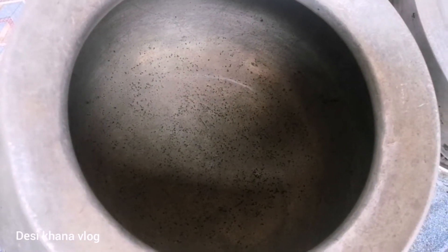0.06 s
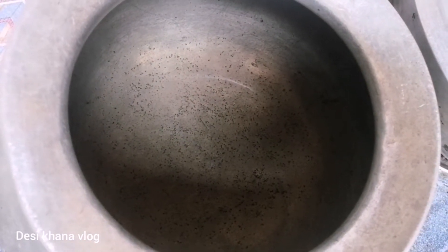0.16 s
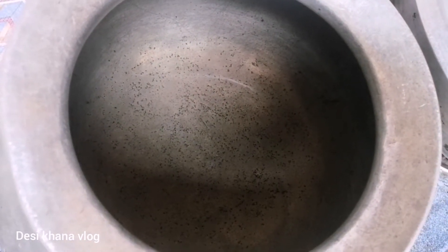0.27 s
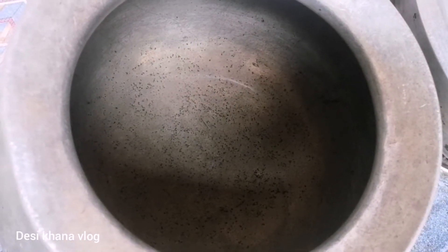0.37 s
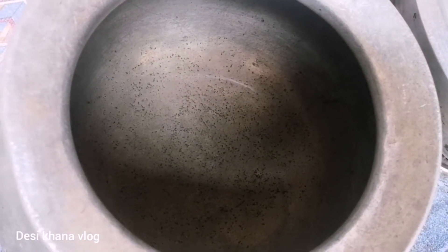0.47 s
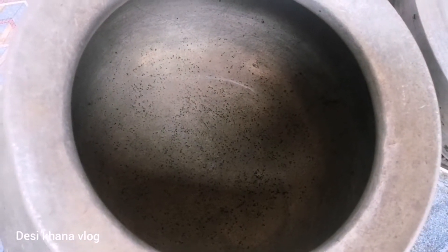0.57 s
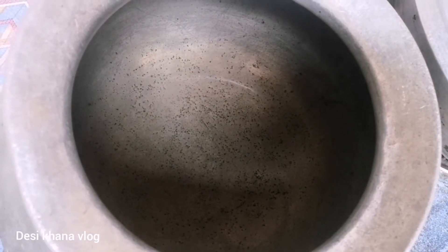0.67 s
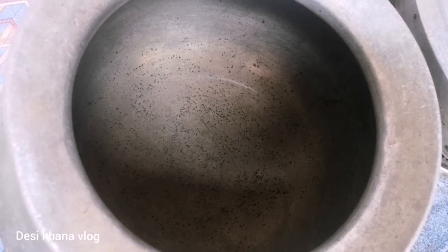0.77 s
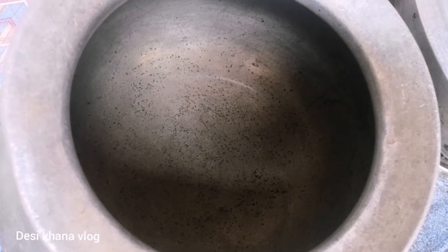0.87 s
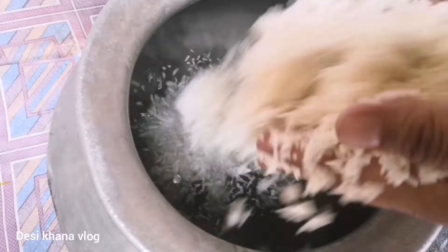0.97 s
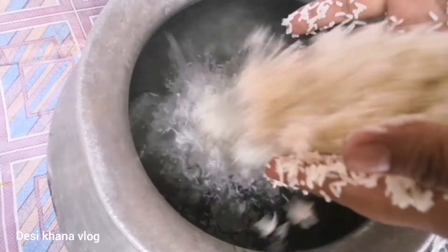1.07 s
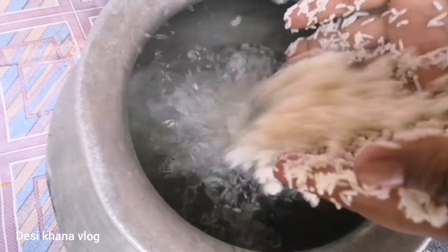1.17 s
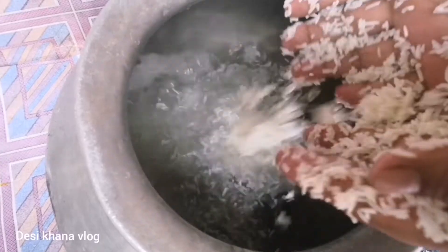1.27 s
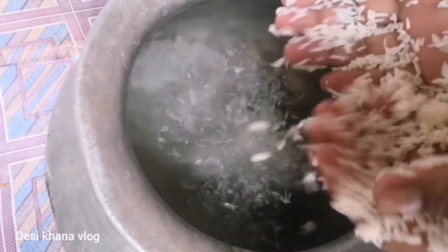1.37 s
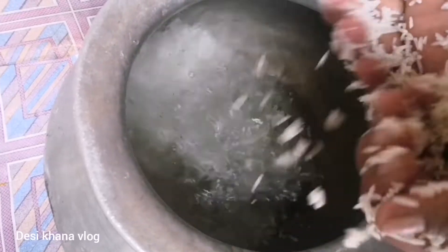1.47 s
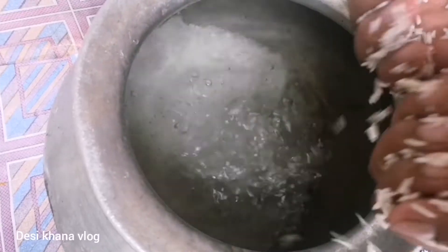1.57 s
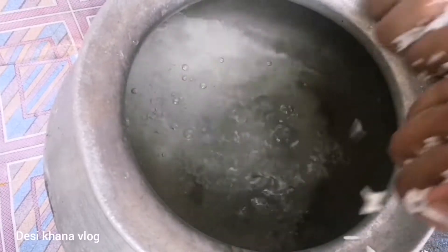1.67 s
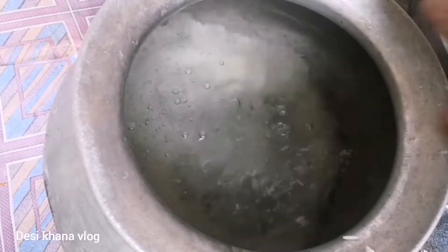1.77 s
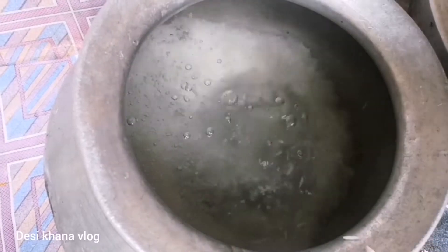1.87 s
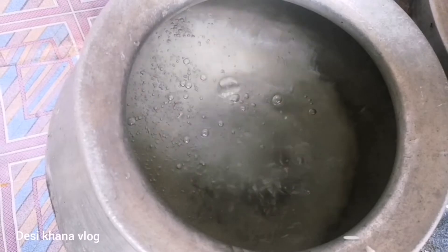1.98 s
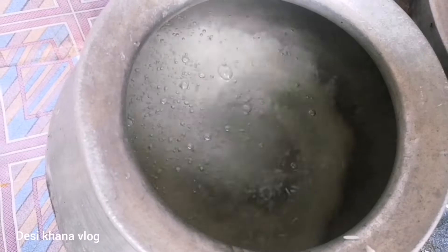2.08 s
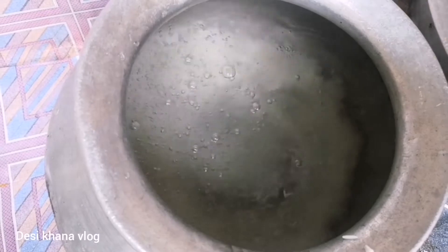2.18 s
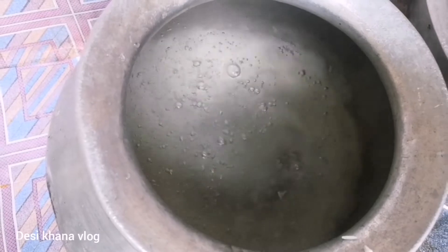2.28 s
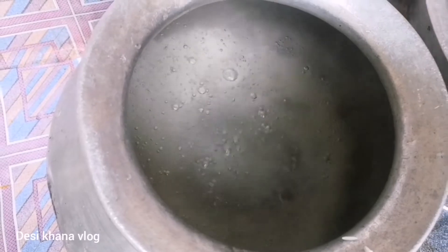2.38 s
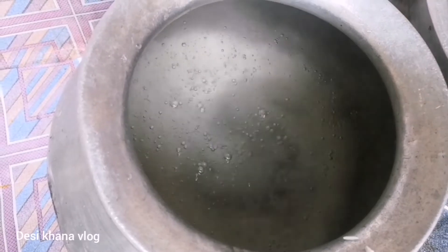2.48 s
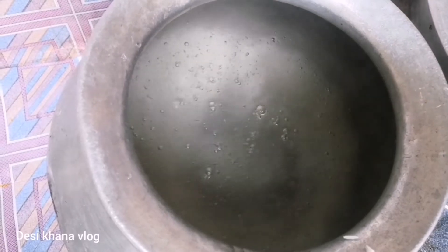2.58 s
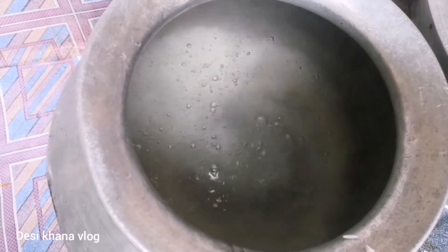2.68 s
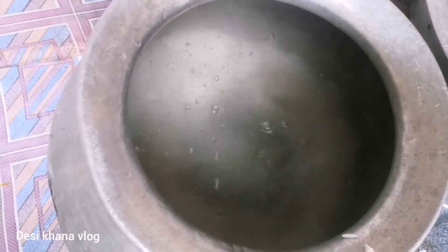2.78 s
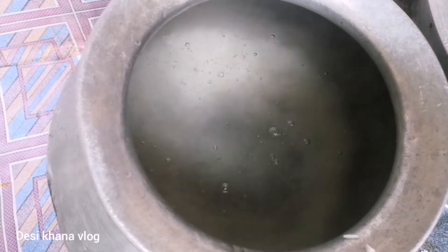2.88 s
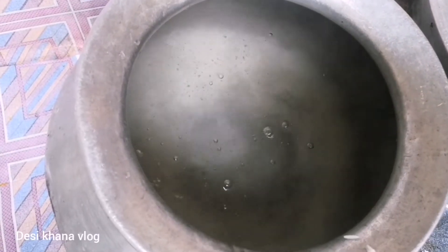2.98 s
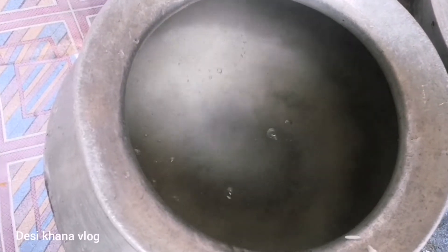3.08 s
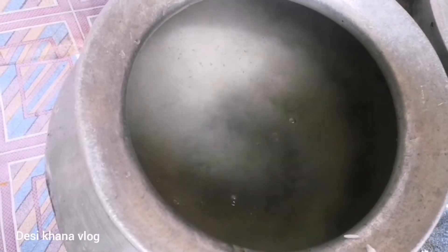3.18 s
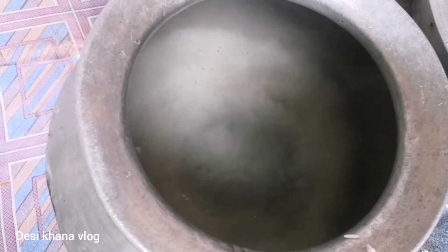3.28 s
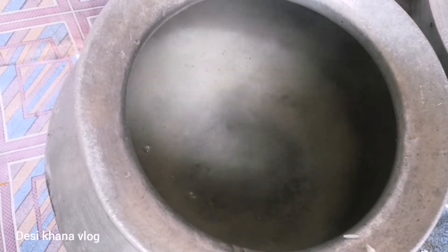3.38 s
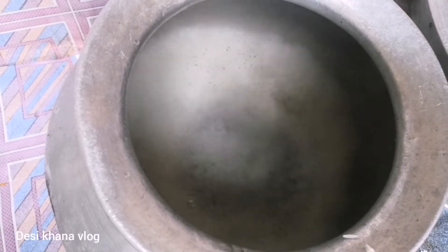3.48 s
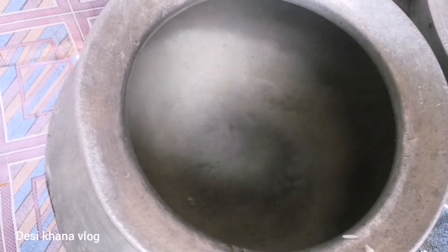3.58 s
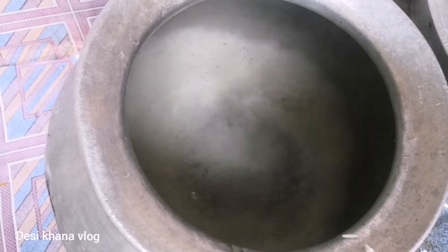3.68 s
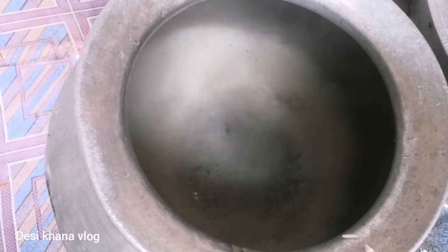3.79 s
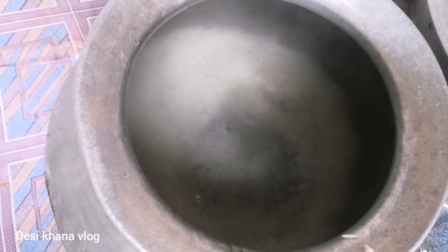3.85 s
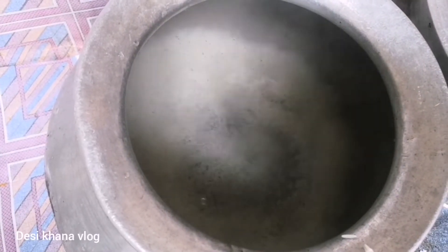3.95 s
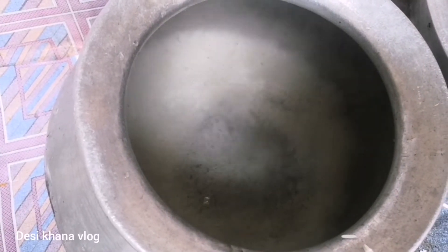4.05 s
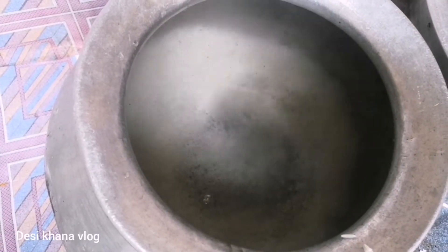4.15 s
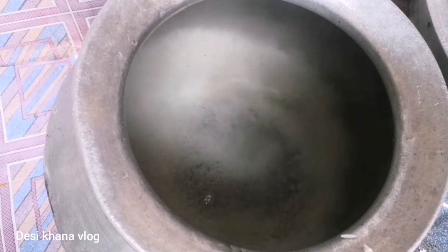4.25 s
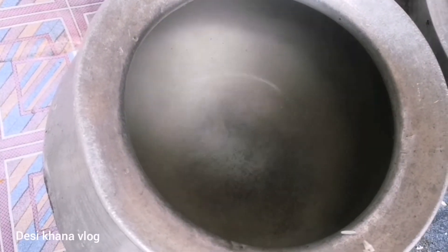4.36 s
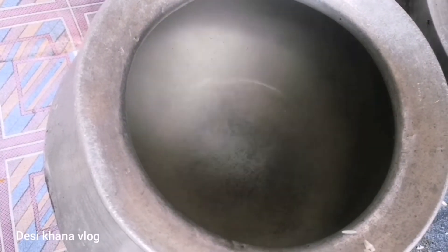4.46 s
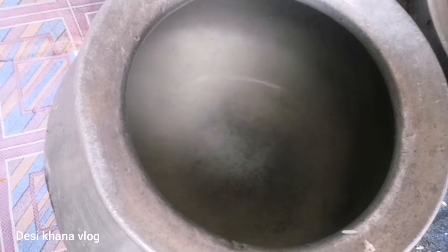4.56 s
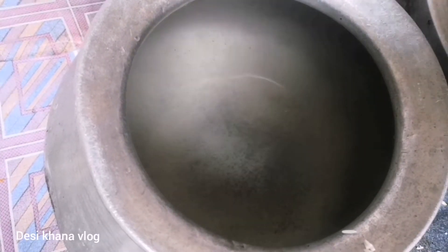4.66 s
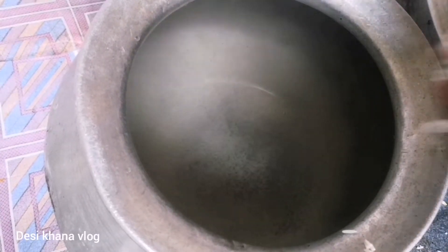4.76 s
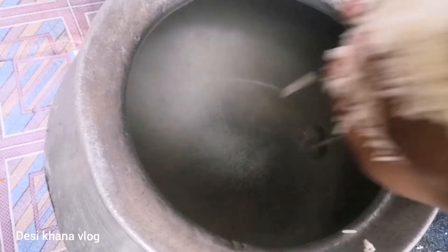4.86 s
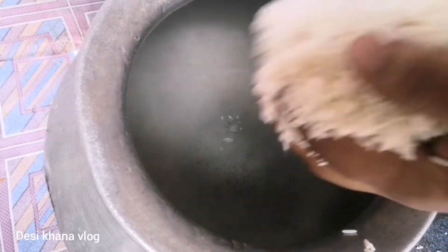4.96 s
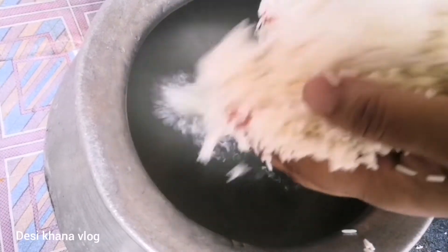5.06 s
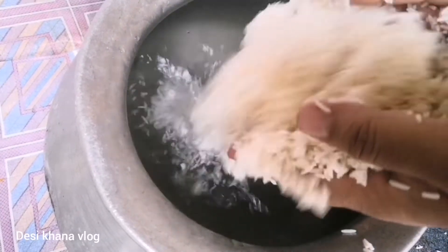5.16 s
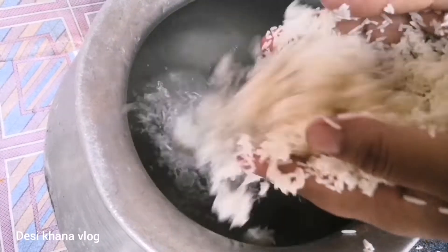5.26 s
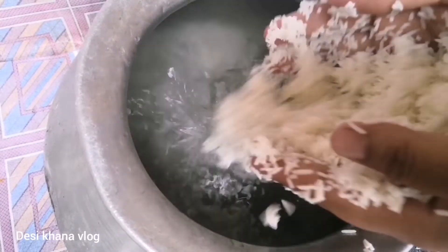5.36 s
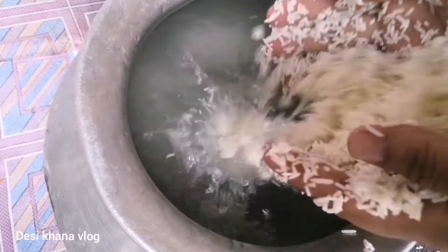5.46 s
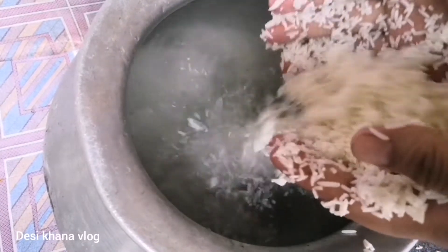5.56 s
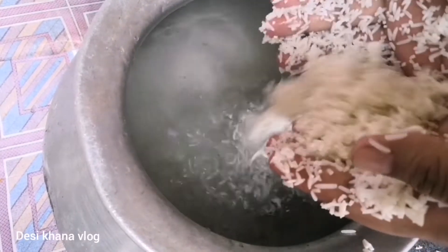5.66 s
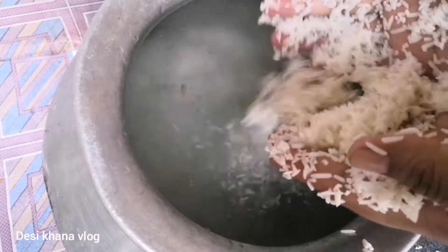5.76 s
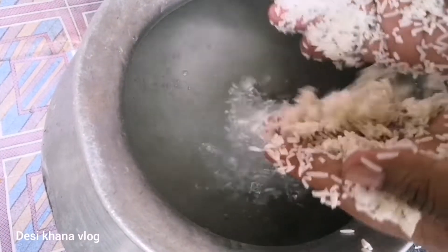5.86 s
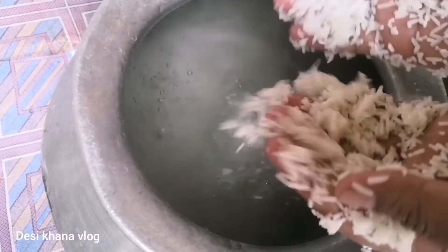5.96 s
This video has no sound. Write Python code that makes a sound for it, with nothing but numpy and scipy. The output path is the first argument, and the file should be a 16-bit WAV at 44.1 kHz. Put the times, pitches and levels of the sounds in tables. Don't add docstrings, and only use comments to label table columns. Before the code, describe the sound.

A quiet kitchen, heard close by a phone: low hum, faint hiss and the soft bright rustle of rice in hands from about 0.1 s. At 0.77 s the sound drops to silence until 0.9 s. The first handful then lands, loudest from 0.98 to 1.45 s, clumps punching into pot water with ringing bubbles, crisp spray, dense patter and low plops. A few stray grains trickle, and at 1.95-2.15 s grains flicked off fingers make a sharp cluster of plips. A lone drop falls at 2.4 s. Rustling at 2.7 s, a tiny metallic rim tick at 3.05 s, a dull bowl knock around 3.3-3.7 s, a dry palm brush at 4.2 s and a single plop at 4.5 s follow. From 5.05 s the second handful splashes in uneven, fizzing spurts with fine high pings, continuing to the end at about 6 s. Short, slight room echo.

```python
import sys
import numpy as np
from scipy import signal
from scipy.fft import rfft, irfft, next_fast_len
from scipy.io import wavfile
from scipy.ndimage import uniform_filter1d, map_coordinates

SR = 44100
rng = np.random.default_rng(int(sys.argv[2]) if len(sys.argv) > 2 else 0)


def amplitude_ratio(level_db):
    exponent = np.asarray(level_db, float) / 20
    return 10 ** exponent


def store_wav(level_fs):
    pcm = np.round(np.clip(np.atleast_2d(level_fs), -1, 1) * 32767)
    wavfile.write(sys.argv[1], SR, pcm.T.astype(np.int16))


N = 265923

# f/Hz, level/dB per Hz
SURFACE_HISS = [(250, -54), (500, 12), (1300, -5), (3000, 3.5), (8000, 0.5), (12000, -6), (15500, -9.5)]


def falling_grains():
    unevenness = amplitude_ratio(0.8 * wobble(30) + 3.2 * wobble(150))
    spurts, fizzing, plopping, finest = flow() * unevenness
    mids = patter(count=7000, hz=2600, spread=0.32, cycles=3.5, spiky_db=1.8, size=260)
    fizz = patter(count=11000, hz=5600, spread=0.27, cycles=6, spiky_db=2.8, size=180)
    plop = patter(count=2500, hz=750, spread=0.42, cycles=1.6, spiky_db=0.9, size=500)
    fine = patter(count=3000, hz=7500, spread=0.03, cycles=12, spiky_db=2, size=220)
    hiss = patchy(rush(SURFACE_HISS), depth_db=2.0)
    bright = amplitude_ratio(-5.0) * fizz + amplitude_ratio(1.02) * hiss
    return amplitude_ratio(-5.0) * spurts * mids + fizzing * bright + plopping * plop + amplitude_ratio(-17.0) * finest * fine


# start t/s, hold t/s, patter level/dB, fizz level/dB re patter
FIRST_POUR = [
    (0.936, 0.048, -36, -2),
    (0.981, 0.021, -25, -5),
    (1.041, 0.045, -32, -3),
    (1.141, 0.04, -27, -7.5),
    (1.201, 0.065, -29.5, -6.5),
    (1.292, 0.069, -33.5, -7),
    (1.417, 0.034, -39.5, -10),
]
STRAY_RICE = [
    (1.5, 0.11, -59, -7),
    (1.597, 0.017, -48.5, -6.5),
    (1.719, 0.082, -51.5, -1.5),
    (1.839, 0.052, -50, -5.5),
    (2.375, 0.0041, -43, -8),
    (2.5, 0.12, -64.5, -1),
    (3.049, 0.037, -46, -5),
    (3.2, 0.082, -67, 4.5),
    (4.482, 0.014, -39, -8),
]
SECOND_POUR = [(5.03, 0.036, -45.5, 3), (5.106, 0.0089, -43.5, 8), (5.154, 0.015, -37, 2),
               (5.215, 0.043, -36.5, -1.5), (5.284, .11, -39, 3.5), (5.464, 0.04, -39, -2.5),
               (5.535, .03, -46, 0), (5.574, 0.075, -41.5, -2), (5.695, 0.054, -42.5, 4.5),
               (5.78, 0.068, -42.5, 1.5), (5.93, 0.015, -48, 1.5), (5.975, 0.026, -43, -3)]
FLICKED_RICE = [
    (1.951, 0.08, -36, -12),
    (2.03, 0.07, -40.5, -10),
    (2.12, 0.036, -51.5, 1.5),
    (2.2, 0.16, -58.5, -2),
]
# rise/dB per s, fall/dB per s, plop level/dB re patter, finest bubbles level/dB re fizz
POURS = [
    (774, 275, -12.5, -0.5),
    (2500, 197, -9.5, -5),
    (700, 308, -6.5, -0.5),
    (1190, 163, -43, 6),
]


def flow():
    layers = []
    for rows, (rise, fall, plop_db, fine_db) in zip([FIRST_POUR, STRAY_RICE, SECOND_POUR, FLICKED_RICE], POURS):
        s, hold, db, fizz_db = np.transpose(rows)
        spurts = swells(s, hold, db, rise, fall)
        bright = swells(s, hold, db + fizz_db, rise, fall)
        layers.append([spurts, bright, amplitude_ratio(plop_db) * spurts, amplitude_ratio(fine_db) * bright])
    return np.sum(layers, axis=0)


# t/s, peak level/dB, bubble f/Hz, spray level/dB re bubble
FIRST_SPLASH = [(0.9213, -22, 3500, -0.5), (0.9811, -11, 2010, -18), (1.017, -23, 2900, 2),
                (1.0357, -20, 1840, -25), (1.051, -27, 3580, -9), (1.068, -39, 1910, 8),
                (1.0773, -3.5, 3340, -18), (1.1423, -17, 3300, -46), (1.1677, -14, 1650, 0),
                (1.2033, -33, 1940, -5), (1.2191, -8.5, 1800, -29), (1.2354, -12, 3200, -19),
                (1.2534, -15, 2730, -35), (1.28, -24, 1860, 5.5), (1.3074, -12, 3460, -34),
                (1.3478, -4.5, 3680, -18), (1.3902, -16, 3050, -10.5), (1.4214, -10, 2500, -17),
                (1.4306, -10.5, 1850, -19)]
STRAY_SPLASH = [(1.599, -30, 1550, -5), (1.6135, -39, 2680, -1), (1.632, -33.5, 1530, -5),
                (1.7272, -27.5, 2200, -14), (1.753, -22, 1510, -19), (1.794, -32.5, 1480, 0),
                (1.8422, -34, 2060, -9), (1.953, -12, 2340, -12.5), (1.9584, -10.5, 1860, -12.5),
                (1.972, -9.5, 2270, -19), (1.976, -11, 2580, -15), (1.9927, -6, 2680, -19),
                (2.0334, -12, 1930, -6.5), (2.1318, -16.5, 2490, -19), (2.376, -19.5, 1600, -15.5),
                (3.049, -31, 3720, -0.5), (4.4833, -27.5, 2050, -7), (4.9276, -39, 1600, -7.5)]
SECOND_SPLASH = [(5.026, -39, 4030, 7), (5.0797, -24, 2570, -28), (5.1142, -14.5, 2080, -6.5),
                 (5.153, -17, 2100, -14), (5.1655, -4.5, 2500, -5.5), (5.171, -19, 1990, 7.5),
                 (5.2272, -14.5, 2180, -3.5), (5.258, -16.5, 2080, -25), (5.2923, -14.5, 2160, -5.5),
                 (5.3496, -19, 2190, -23), (5.366, -15, 2120, -6), (5.38, -16, 1880, -8),
                 (5.406, -40, 2680, 6), (5.4756, -34.5, 1900, 6.5), (5.5862, -24, 2180, -1.5),
                 (5.628, -22, 4100, -3), (5.6363, -17, 3300, -2.5), (5.7024, -30.5, 2060, 3),
                 (5.758, -23, 2300, -18), (5.785, -18.5, 3500, -15), (5.8093, -14.5, 1860, -13),
                 (5.8341, -26, 1940, 1), (5.8446, -39, 2770, 8), (5.9209, -43, 1920, -3),
                 (5.9417, -30, 4230, 2.5), (5.9953, -24, 1600, -14)]
# t/s, peak level/dB, f/Hz
PLOPS = [(0.981, -23.5, 770), (1.008, -27.5, 547), (1.021, -34, 550), (0.981, -21.5, 1190),
         (1.959, -33, 1350), (1.972, -30, 1370), (2.035, -25, 1350), (5.174, -29, 530), (5.319, -32, 700),
         (1.144, -29, 1100), (1.166, -26, 617), (1.238, -20.5, 485), (1.301, -57, 620), (1.846, -40, 766),
         (4.503, -30, 1340), (5.165, -23, 703), (5.227, -33, 820), (5.293, -25.5, 727), (5.34, -32.5, 630),
         (5.383, -21, 1140), (5.785, -26.5, 1240)]
SPRAY_HZ, SPRAY_VARIES = 5300, 0.08
PAN_DB, PAN_VARIES_DB = [-2.5, -8, -6], 3.5


def splashes():
    groups = [FIRST_SPLASH, STRAY_SPLASH, SECOND_SPLASH]
    s, db, hz, spray_db = np.vstack(groups).T
    chance = rng.standard_normal((len(s), 2))
    spray_hz = SPRAY_HZ * np.exp(SPRAY_VARIES * chance[:, 0])
    group_pan = np.repeat(PAN_DB, [len(rows) for rows in groups])
    pan_db = group_pan + PAN_VARIES_DB * chance[:, 1]
    body = clump(s, hz, db - 7, pan_db + 3, 0.28, 1.57, 0.00451, count=6, size=300)
    spray = clump(s, spray_hz, db + spray_db - 4, pan_db + 5, 0.42, 2, 0.007, count=24, size=130)
    crack = clump(s, 1.96 * hz, db - 18.5, pan_db + 7, 0.26, 0.61, 0.0027, count=3, size=60)
    s, db, hz = np.transpose(PLOPS)
    plops = clump(s, hz, db + 4.0, 0 * s, 0.018, 2.0, 0.00836, count=3, size=900)
    return body + spray + crack + plops


# t/s, peak level/dB, f/Hz, left-right level/dB
PINGS = [(0.9267, -24.5, 7600, -9), (0.9527, -33, 7380, -5.5), (0.9842, -28, 7100, -5.0),
         (0.9991, -27, 7500, -7), (1.0074, -19, 7450, -8.0), (1.0184, -20, 7410, -6.5),
         (1.05, -16, 7740, -7.0), (1.1323, -34, 7990, -2.0), (1.1677, -5, 6730, 1),
         (1.2331, -24, 6910, -7.5), (1.2424, -19, 7020, -5.0), (1.28, -28, 7300, -6.0),
         (5.1103, -31, 7150, -3.0), (5.1532, -29, 6960, -2), (5.3173, -28, 7110, -5.5),
         (5.3552, -31, 6800, -5.0), (5.3667, -23, 7560, -9.0), (5.4056, -21, 7680, -12),
         (5.456, -38, 7600, -8), (5.4755, -25, 7500, -14), (5.4956, -27, 7560, -8.0),
         (5.5423, -30, 7750, -6), (5.5872, -24, 7450, -18), (5.6141, -39, 7300, -7.0),
         (5.6264, -34, 7600, -9.0), (5.6326, -27, 7430, -8.5), (5.6665, -31, 7520, -8.5),
         (5.6765, -30, 7260, -8.5), (5.6944, -26, 7160, -11.5), (5.7024, -19, 7430, -16),
         (5.7304, -33, 7940, -6.0), (5.7573, -27, 7460, -9), (5.786, -30, 7860, -7.5),
         (5.8072, -34, 7280, -6.5), (5.8341, -26, 7100, -11.0), (5.8473, -20.5, 7260, -11)]
# t/s, peak level/dB, f/Hz, left-right level/dB
DROPS = [(0.9864, -19, 1860, -7), (1.0534, -14, 3610, -6.5), (1.088, -23, 5700, -4.5),
         (1.1228, -28, 1960, -3.5), (1.1423, -22, 3560, 1), (1.2042, -15.5, 1765, -9),
         (1.255, -15.5, 2500, -7), (1.2714, -17, 3550, -8), (1.2844, -19, 4240, -7),
         (1.3344, -19, 3570, -9), (1.3644, -27, 1890, -3.5), (1.4344, -18, 1850, -2.0),
         (1.515, -39, 3550, -2.5), (1.5594, -35, 2170, 3), (1.6696, -44, 1630, 0), (1.735, -26, 2300, 1),
         (1.8824, -38, 1870, -3), (2.0404, -15.5, 2620, -8), (2.1274, -22, 2600, -9),
         (2.1354, -32, 2630, -10), (2.3844, -37, 1720, -4.0), (4.1874, -37, 5260, -14.5),
         (4.1904, -37, 4820, -13.0), (4.1954, -42, 5810, -10.5), (4.2023, -37, 4860, -16.0),
         (4.2018, -30.5, 5000, -12.5), (4.242, -37, 5040, -10.0), (4.2567, -36, 5670, -17.0),
         (4.2567, -33, 4710, -9.5), (4.4902, -29, 2170, 2), (5.1174, -20.5, 1870, -12),
         (5.2275, -15, 4660, -7.0), (5.3194, -31, 1870, -3.0), (5.3787, -17, 4500, -10),
         (5.3874, -25, 1105, -5.0), (5.4954, -25, 5100, -4.0), (5.5064, -29, 2700, -2.0),
         (5.5797, -20.5, 2200, -3.5), (5.7304, -24, 2010, -7), (5.7493, -23, 2370, -4.0)]


def drops():
    s, db, hz, pan_db = np.transpose(PINGS)
    pings = clump(s, hz, db - 12, pan_db - 5, 0.012, 11, 0.005, count=3, size=200)
    s, db, hz, pan_db = np.transpose(DROPS)
    plops = clump(s, hz, db - 1.5, pan_db - 1.5, 0.046, 2.8, 0.00315, count=2, size=300)
    return pings + plops


# t/s, peak level/dB, f/Hz
TICKS = [(2.69, -39, 5000), (2.775, -39, 2500), (2.842, -30, 3000), (3.0485, -38, 7000), (4.05, -35, 7900),
         (4.2135, -23, 3470), (1.482, -36, 9000), (1.736, -27, 7000), (1.754, -23.5, 6000),
         (1.7955, -30, 5000), (4.492, -26, 8000), (3.049, -35, 12000), (4.4825, -38, 9000),
         (4.92, -32, 9000), (5.2925, -11, 10000), (5.505, -23, 4000), (5.668, -25, 5000),
         (5.679, -30, 5000), (5.7575, -23, 9500)]


def ticks():
    s, db, hz = np.transpose(TICKS)
    return clump(s, hz, db, 0 * s, 0.1, 0.6, 0.0006, count=2, size=60)


# t/s, level/dB
RIM = (3.062, -49)
# f/Hz, level/dB, time to fade 60 dB t/s
RINGS = [
    (2300, 5.5, 0.19),
    (2410, -1, 0.15),
    (3720, 5.5, 0.21),
]


def rim():
    start, level_db = RIM
    t = np.clip(np.arange(N) / SR - start, 0, None)
    out = np.zeros(N)
    for hz, db, t60 in RINGS:
        fade = amplitude_ratio(level_db + db - 60 * t / min(t60, 0.3)) * (t > 0)
        out += fade * np.sin(2 * np.pi * hz * t + 2 * wobble(220))
    return out


# start t/s, hold t/s, level/dB, dull part level/dB re bright
RUSTLE = [(0.14, 0.12, -54, 1), (0.286, 0.22, -52, -2), (0.65, 0.006, -54, 3.5), (0.53, 0.22, -66, 2),
          (0.752, 0.026, -52, -6), (2.686, 0.029, -54, -3), (2.722, .13, -52, 5), (3.347, 0.076, -63, 1),
          (3.526, 0.18, -62, 6.5), (3.737, 0.12, -58, 3), (4.017, 0.033, -59.5, -5),
          (4.203, 0.053, -58.5, 12), (4.65, 0.21, -68.5, 7.5)]
STROKE = (2500, 330)
# f/Hz, level/dB per Hz
SLIDE = [(1650, -45), (2800, -12), (3950, 2), (4420, -2), (5650, 4), (6370, -1), (7810, -1), (9370, -11),
         (15000, -37)]
# start t/s, hold t/s, level/dB
FLICKS = [
    (4.192, 0.028, -52),
    (4.228, 0.033, -46),
]
FLICK_SLOPES = (4000, 2000)
# f/Hz, level/dB per Hz
BRUSH = [(2500, -45), (3600, -5), (4300, 1), (5800, -2), (7800, -4), (9000, -16), (15000, -46)]


def rustle():
    s, hold, db, dull_db = np.transpose(RUSTLE)
    dull_hiss = rush([(700, -8), (1300, -12.5), (2000, -6), (3200, -9.0), (5000, -33)])
    bright = swells(s, hold, db, *STROKE) * patchy(rush(SLIDE), depth_db=0.8)
    dull = swells(s, hold, db + dull_db - 5.5, *STROKE) * dull_hiss
    brush = swells(*np.transpose(FLICKS), *FLICK_SLOPES) * rush(BRUSH)
    return amplitude_ratio(1.5 * wobble(120)) * (bright + brush + dull)


# t/s, f/Hz, level/dB, time to fade 60 dB t/s
BOWL = [
    (3.488, 455, -41.5, 0.37),
    (3.548, 570, -40, 0.14),
    (3.55, 710, -49, 0.12),
    (3.51, 230, -44.5, 0.19),
    (3.553, 313, -36.5, 0.19),
    (3.545, 465, -38, 0.26),
    (3.3, 715, -28, 0.04),
]


def bowl():
    t = np.arange(N) / SR
    out = np.zeros(N)
    for s, hz, db, t60 in BOWL:
        after = np.clip(t - s, 0, None)
        fade = amplitude_ratio(db - 60 * after / t60 - 2.5 + 3.2 * wobble(50))
        swell = 1 - np.exp(-after / 0.02)
        out += fade * swell * np.sin(2 * np.pi * hz * t + 1.1 * wobble(60))
    return out


# f/Hz, level/dB per Hz
KITCHEN = [(12, -45.5), (20, 0.5), (70, -5), (93, -63), (133, 0.5), (176, -22), (268, -10), (335, -10.5),
           (496, -10), (674, -10.5), (1150, -13), (1550, -13), (1850, -11.5), (2300, -19.5), (2800, -15),
           (3220, -22), (6500, -24), (7600, -20.5), (8600, -27.5), (14100, -35), (15800, -33)]
KITCHEN_DB, HUM_DB = -57, -63
# start t/s, hold t/s, level/dB
SLOSH = [
    (0.961, 0.4, -49),
    (1.586, 0.03, -59),
    (1.963, 0.15, -51.5),
    (3.063, 0.017, -55.5),
    (4.207, 0.015, -55),
    (4.52, 0.017, -54.5),
    (5.047, 0.6, -54),
    (5.553, 0.15, -48.5),
    (5.753, 0.34, -56.5),
]
SLOSH_SLOPES = (550, 80)


def kitchen():
    low = rush([(18, -6.5), (40, 0.5), (150, -2.0), (280, -3), (500, -37.0), (900, -120)])
    shake = np.hypot(amplitude_ratio(HUM_DB), swells(*np.transpose(SLOSH), *SLOSH_SLOPES))
    drift = amplitude_ratio(0.7 * wobble(4))
    hiss = amplitude_ratio(KITCHEN_DB) * drift * patchy(rush(KITCHEN), depth_db=1.64)
    return hiss + shake * amplitude_ratio(2.3 * wobble(13)) * low


# f/Hz, time to fade 60 dB t/s
WALLS = [(300, 0.26), (2000, 0.17), (10000, 0.0043)]


def room(x):
    out, step = np.zeros((2, N + SR)), SR // 4
    for start in range(0, N, step):
        hz, t, z = signal.stft(rng.standard_normal((2, SR // 3)), SR, nperseg=256)
        fade_db = -60 * t / along(WALLS, hz)[:, None] - 1.7 * (hz[:, None] < 1150)
        tail = signal.istft(z * amplitude_ratio(fade_db), SR, nperseg=256)[1]
        tail = tail / np.linalg.norm(tail[0])
        part = signal.fftconvolve(x[:, start:start + step], tail, axes=1)
        out[:, start:start + part.shape[1]] += part
    return out[:, :N]


def clump(s, hz, db, pan_db, spread, cycles, lasts, count, size):
    u, g = rng.random((len(s), count, 3)), rng.standard_normal((len(s), count))
    late = (np.arange(count) + u[..., 0]) / count
    swell = np.exp(-2.6 * late) + 0.12
    gain = swell[..., None] * amplitude_ratio(db[:, None, None] + pan_db[:, None, None] * [0.5, -0.5])
    pitch = np.clip(hz[:, None] * np.exp(spread * g * np.sqrt(late)), 200, SR / 3)
    times = s[:, None] + lasts * (late - late[:, :1]) + 0.0005
    phase = u[..., 1:].reshape(-1, 2)
    return bubbles(times.ravel(), pitch.ravel(), gain.reshape(-1, 2), cycles, phase, size)


def patter(count, hz, spread, cycles, spiky_db, size):
    u, g = rng.random((count, 4)), rng.standard_normal((count, 3))
    gain = amplitude_ratio(-spiky_db * np.log(u[:, [1]] + 0.015) + 3.3 * g[:, 1:])
    pitch = np.clip(hz * np.exp(spread * g[:, 0]), 200, SR / 3)
    return unit(bubbles(u[:, 0] * N / SR, pitch, gain, cycles, u[:, 2:], size))


def bubbles(s, hz, gain, cycles, phase, size):
    turns = hz[:, None] * np.arange(size) / SR
    life = turns / cycles
    envelope = life * np.exp(1 - life - 0.29 * life ** 2)
    ring = envelope * np.exp(2j * np.pi * turns * (1 + 0.011 * life))
    first = np.clip(s * SR, 0, N - 1).astype(int)
    at = (first[:, None] + np.arange(size)).ravel()
    path = phase[:, [0]] + 0.5 * (phase[:, [1]] - 0.5) * [0, 1]
    seen = gain * np.exp(2j * np.pi * path)
    return np.array([np.bincount(at, (ring * seen[:, [c]]).real.ravel(), N + size)[:N] for c in (0, 1)])


def swells(start, hold, db, rise, fall):
    t = np.arange(N) / SR
    power = np.zeros(N)
    for s, h, d in zip(start, hold, db):
        before, after = np.clip(s - t, 0, 1), np.clip(t - s - h, 0, 1)
        power += amplitude_ratio(2 * (d - rise * before - fall * after))
    return np.sqrt(power)


# f/Hz, likeness (1 same, 0 unrelated, below 0 opposed)
ALIKE = [(60, 0.98), (180, 1), (550, -0.27), (1650, 0.13), (4970, -0.31), (15000, -0.18)]


def rush(spectrum):
    def response(hz):
        turn = np.arccos(np.clip(along(ALIKE, hz), -1, 1)) / 2
        return amplitude_ratio(along(spectrum, hz)) * [np.cos(turn), np.sin(turn)]
    mid, side = filtered(rng.standard_normal((2, N)), response)
    return unit(np.array([mid + side, mid - side]))


def patchy(x, depth_db):
    z = signal.stft(x, nperseg=512)[2]
    field = uniform_filter1d(rng.standard_normal(z.shape[1:]), size=9, axis=0)
    field = uniform_filter1d(field, size=10, axis=1)
    return unit(signal.istft(z * amplitude_ratio(depth_db * unit(field)), nperseg=512)[1][:, :N])


def wobble(rate):
    return map_coordinates(rng.standard_normal(int(N * rate / SR) + 4), [np.arange(N) * rate / SR])


def unit(x):
    return x / np.sqrt(np.mean(x ** 2) + 1e-20)


def along(points, hz):
    f, v = np.transpose(points)
    return np.interp(np.log(hz + 1), np.log(f + 1), v)


def filtered(x, response):
    m = 2 * next_fast_len(N // 2 + SR // 4)
    return irfft(rfft(x, m) * response(np.fft.rfftfreq(m, 1 / SR)), m)[..., :N]


def causal(gain):
    c = irfft(np.log(gain + 1e-6))
    half = len(c) // 2 - 1
    c = c * np.r_[1, 2 * np.ones(half), 1, np.zeros(half)]
    return np.exp(rfft(c))


# f/Hz, level/dB per Hz
POT = [(180, -60), (300, -41), (397, -12), (509, -14), (968, -5), (1120, -1.5), (1510, -8), (1870, 2),
       (2790, -0.5), (3630, -3), (3940, 1.5), (6360, 1), (7500, 9.5), (14500, -7.5), (15500, -24)]
LEFT_LAG = 26 / 44100
LAG_FROM_HZ, LAG_FULL_HZ = 320, 1900
# f/Hz, left-right level/dB
PORTS = [(60, -0.5), (130, 1.5), (290, -2), (640, -2.5), (1410, -4.5), (3100, -4), (6820, -8), (8300, -5.5),
         (9800, 4.5), (15000, 1.5)]


def scene():
    sides = np.array([[0.5], [-0.5]])

    def pot(hz):
        colour = causal(amplitude_ratio(0.5 * along(POT, hz) - 0.5))
        share = np.clip((hz - LAG_FROM_HZ) / (LAG_FULL_HZ - LAG_FROM_HZ), 0, 1)
        return colour * np.exp(-2j * np.pi * hz * LEFT_LAG * sides * share)

    def ports(hz):
        return amplitude_ratio(along(PORTS, hz) * sides)

    water = filtered(falling_grains() + splashes() + drops(), pot) + rim() + ticks()
    echo = amplitude_ratio(-11.5) * room(water)
    return filtered(water + echo + rustle() + kitchen(), ports) + bowl() * amplitude_ratio([[-1.5], [1.5]])


# f/Hz, share of the neighbours' level
SPARSE = [(300, .1), (1500, .3), (2600, .6), (7000, .55), (9500, .76), (12000, .88), (14500, .92)]
EDGE_HZ, EDGE_STEP_HZ = 15000, 270


def thinned(x):
    frame = dict(window="cosine", nperseg=2048, noverlap=1024)
    hz, t, z = signal.stft(np.pad(x, ((0, 0), (640, 0))), SR, **frame)
    size = np.abs(z).mean(axis=0)
    near = uniform_filter1d(size, size=9, axis=0)
    wide = uniform_filter1d(size, size=51, axis=0)
    mood = rng.standard_normal(len(t))
    edge = EDGE_HZ + EDGE_STEP_HZ * np.repeat(rng.integers(0, 4, len(t)), 3)[:len(t)]
    strong = near > along(SPARSE, hz)[:, None] * amplitude_ratio(0.5 * mood) * wide
    kept = strong & (hz[:, None] < edge)
    return signal.istft(z * kept, SR, **frame)[1][:, 640:N + 640]


def band_limit(x):
    return signal.sosfilt(signal.butter(12, 16440, fs=SR, output="sos"), x)


# start t/s, end t/s
DROPOUT = (0.7726, .893)


def record(dry):
    t = np.arange(N) / SR
    gate = np.clip(np.maximum(DROPOUT[0] - t, t - DROPOUT[1]) / 0.00088, 0, 1)
    narrow = filtered(dry, lambda hz: amplitude_ratio(along([(15600, 0), (15900, -6), (16200, -50)], hz)))
    return band_limit(thinned(narrow) * gate)


dry = scene()
out = record(dry)
store_wav(out)
```